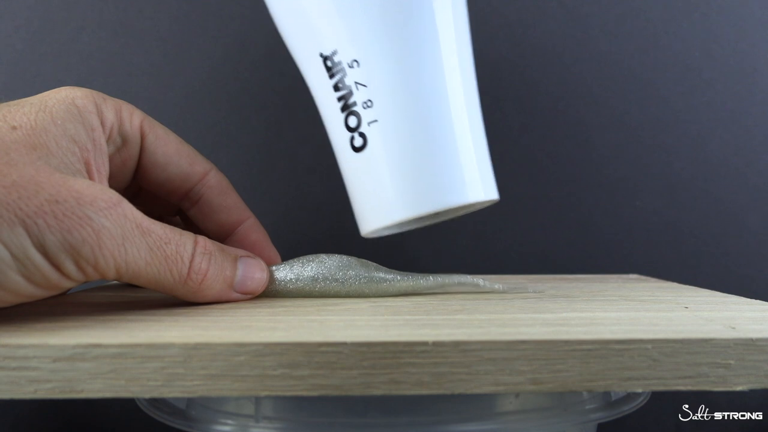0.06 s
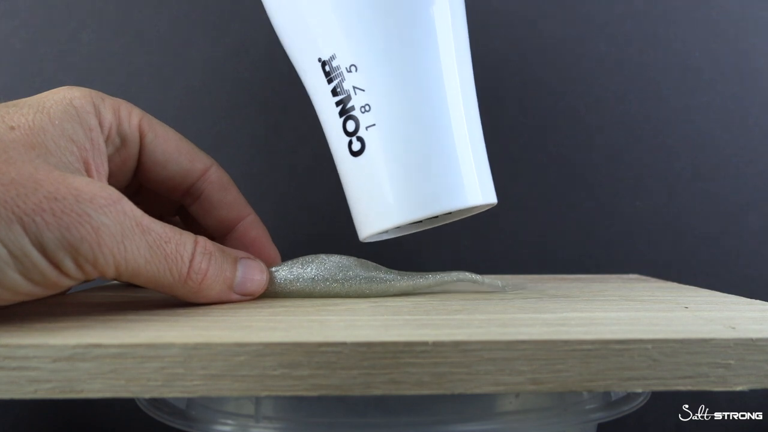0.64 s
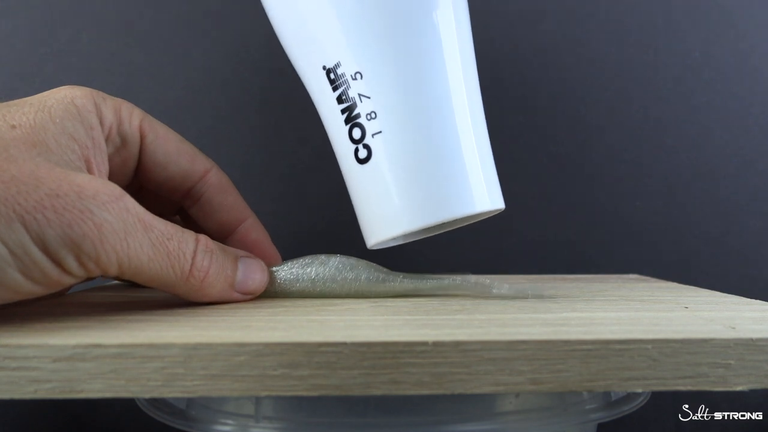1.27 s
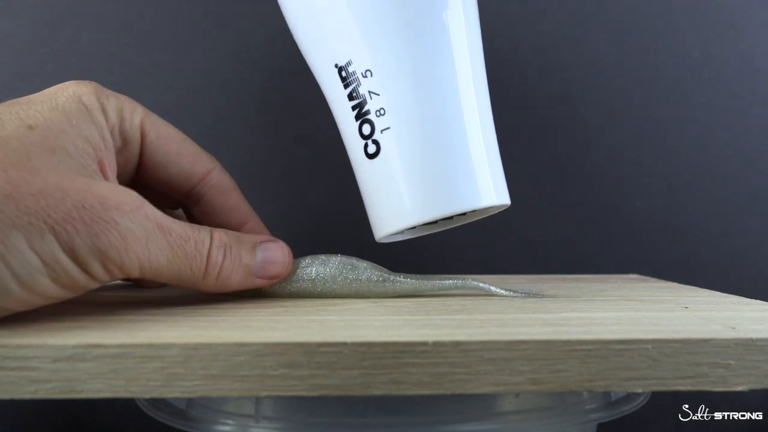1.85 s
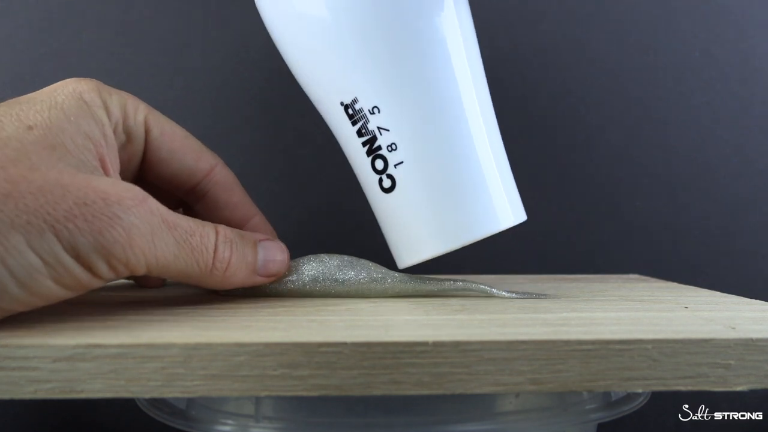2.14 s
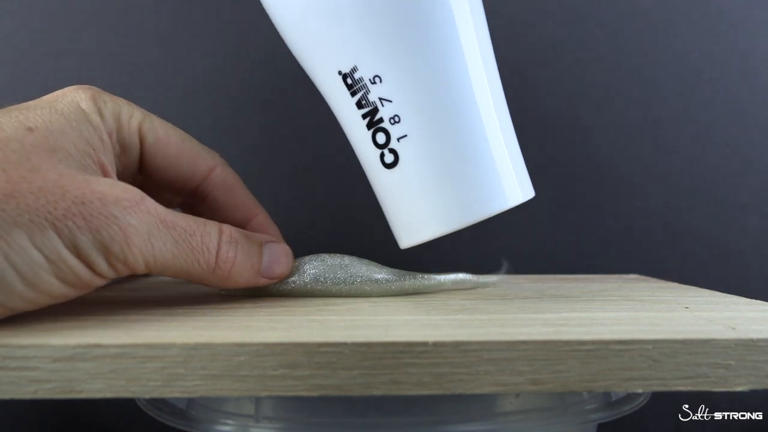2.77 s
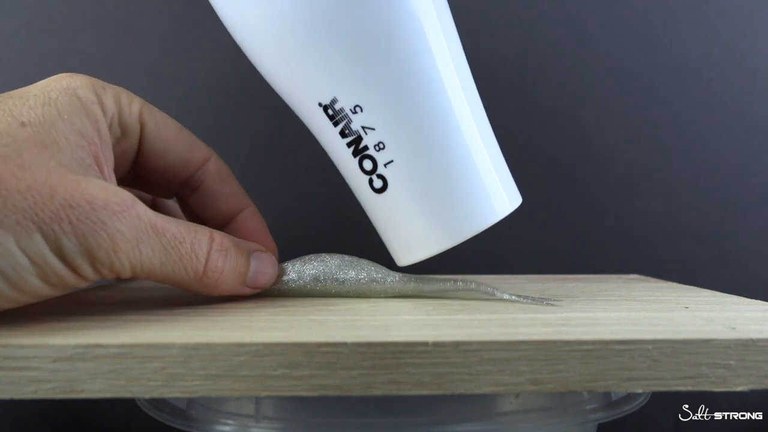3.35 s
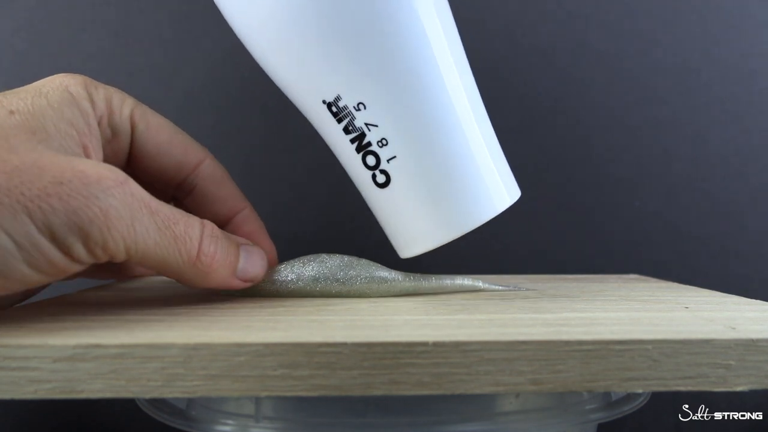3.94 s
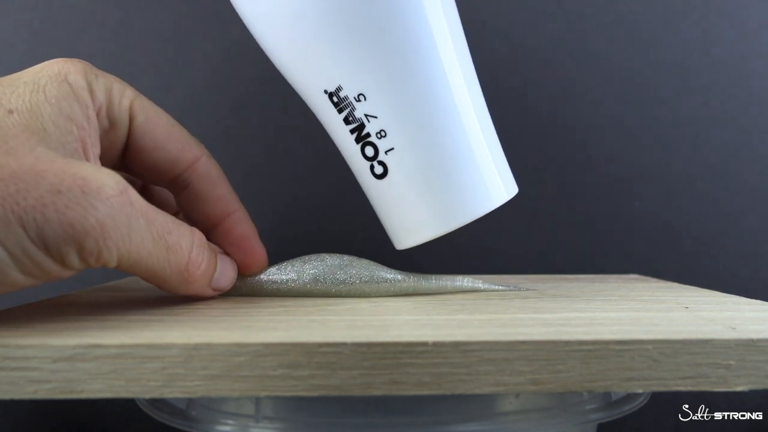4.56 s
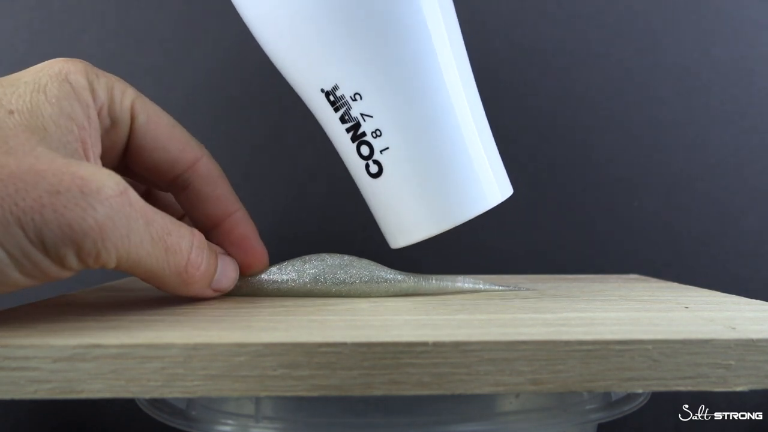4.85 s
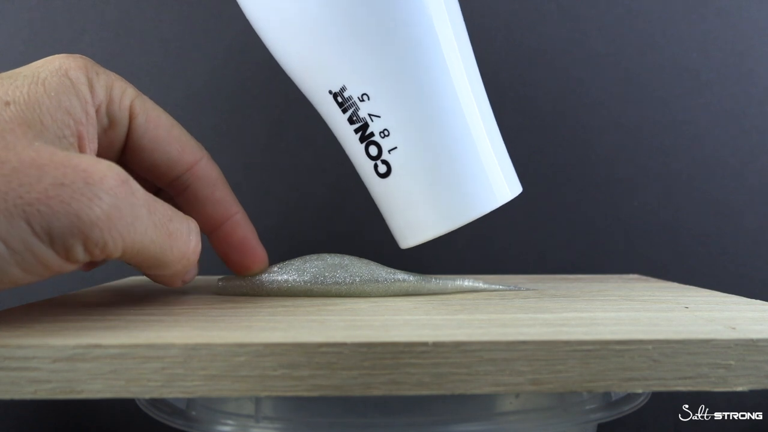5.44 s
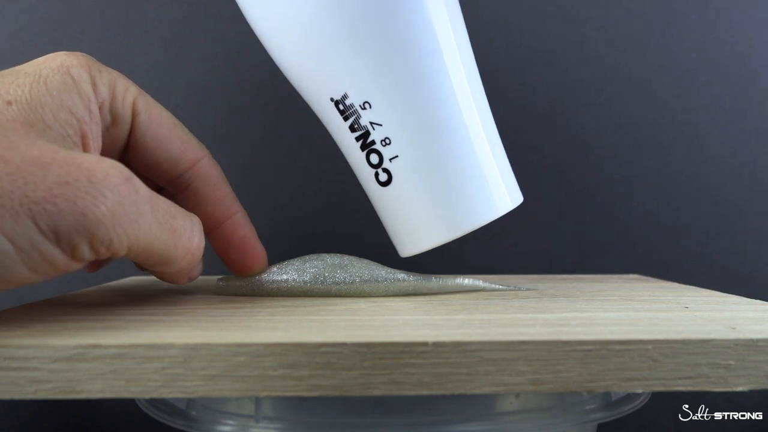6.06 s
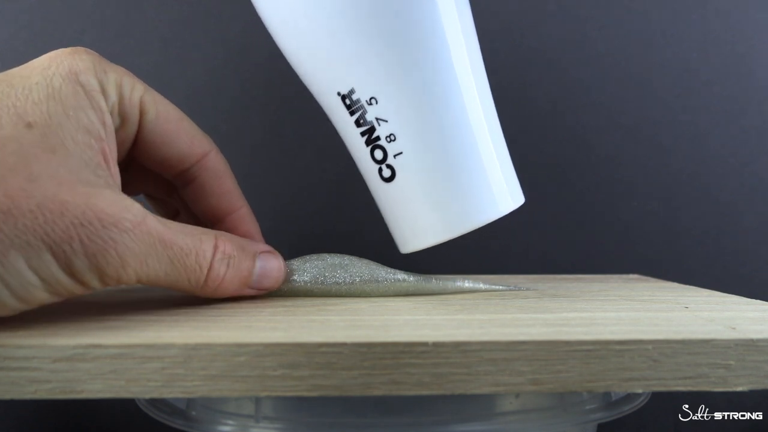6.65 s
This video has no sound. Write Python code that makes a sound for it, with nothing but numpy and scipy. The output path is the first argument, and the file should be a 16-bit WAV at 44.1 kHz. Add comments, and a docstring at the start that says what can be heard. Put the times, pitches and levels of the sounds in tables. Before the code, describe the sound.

Close, constant hair dryer air rush and faint fan whine, easing a little after two seconds, with slight rapid skipping from then on.

```python
"""Hair dryer on a wooden board

A handheld dryer blows steadily, close up and in mono. Air rushes through the resonant housing and
the fan whines faintly on multiples of its shaft speed. After two seconds the nozzle tilts down to
the board: the rush softens and the fan slows a little. From two seconds on, the sound also skips
about six times a second, like choppy audio, with faint low bumps and now and then a tiny tick."""
import sys
import numpy as np
from scipy import signal
from scipy.fft import rfft, irfft, next_fast_len
from scipy.io import wavfile
from scipy.ndimage import uniform_filter1d, map_coordinates

SR = 44100
rng = np.random.default_rng(int(sys.argv[2]) if len(sys.argv) > 2 else 0)


def unload_audio(sound):
    """Save the sound as a 16-bit wav file, at the path given as the first command line argument."""
    columns = np.transpose(np.atleast_2d(sound))
    # keep every value between -1 and 1, then stretch to whole-number steps
    steps = np.round(np.clip(columns, -1, 1) * 32767)
    wavfile.write(sys.argv[1], SR, steps.astype(np.int16))


N = 295911

# fan speed, easing off as the nozzle tilts: (time [s], speed [turns/s])
SHAFT_SPEED = [(0.0, 293.1), (1.9, 293.1), (2.15, 292.3), (2.85, 291.0), (3.75, 291.1), (4.5, 289.9),
               (4.9, 290.8), (6.1, 289.7), (6.71, 290.3)]
SKIP_FROM_S = 2.04


def rush(tilt, trim_db, flutter_db):
    """Turbulent air through the fan and housing; its colour follows the tilt of the nozzle."""
    # strength of the air stream: (time [s], level before trim [dB])
    flow = [(0.05, -37.5), (1.86, -37.5), (2.04, -39.5), (4.2, -40), (6.71, -39.5)]
    eddies = blade_chop(turbulence(patchy_db=0.68), first_turn=0.049, later_turns=0.048)
    eddies = room(eddies, wet_db=-18, t60=.15)
    upright = unit(filtered(eddies, lambda hz: air_colour(hz, 0)))
    tilted = unit(filtered(eddies, lambda hz: air_colour(hz, 1)))
    level_db = curves(flow)[0] + trim_db + flutter_db * wobble(13)
    return amp(level_db) * ((1 - tilt) * upright + tilt * tilted)


def turbulence(patchy_db):
    """Eddies: white noise whose bands swell and sink in small random patches."""
    spectrum = signal.stft(rng.standard_normal(N), nperseg=512)[2]
    patches = uniform_filter1d(rng.standard_normal(spectrum.shape), size=8, axis=0)  # across pitch
    patches = uniform_filter1d(patches, size=20, axis=1)  # across time
    return signal.istft(spectrum * amp(patchy_db * unit(patches)), nperseg=512)[1][:N]


def blade_chop(eddies, first_turn, later_turns):
    """The blades cut each eddy again on the next turns, so a little noise repeats at the shaft period."""
    speed, = curves(SHAFT_SPEED)
    one, two, three = (map_coordinates(eddies, [np.arange(N) - turns * SR / speed])
                       for turns in (1, 2, 3))
    return eddies + first_turn * one + later_turns * (two + three)


def air_colour(hz, pose):
    """Gain of the jet's spectrum lifted by the housing's resonances; pose 0 is upright, 1 tilted."""
    # spectrum of the jet: (frequency [Hz], upright level [relative dB], tilted level [relative dB])
    jet = [(50, -44, -45), (100, -31.5, -31), (183, -18, -19.5), (262, -10, -10.5), (484, -5, -6.5),
           (1070, -6, -5), (1320, 1, -1.5), (2450, -5.5, -6), (3440, -8, -10), (5810, -6.5, -8),
           (8230, -11, -15), (9140, -16.5, -20.5), (12400, -26, -27.5), (15400, -46, -45)]
    # housing and nozzle resonances: (centre [Hz], width [Hz], upright lift [dB], tilted lift [dB])
    resonances = [(344, 50, 1, 1.5), (410, 25, 2, 3), (614, 49, 5, 4), (693, 65, 6, 3.5), (776, 35, 2.5, 3),
                  (858, 116, 11.5, 8), (994, 71, 3.5, 3.5), (1460, 56, 0, 1.5), (1562, 110, 3, 2.5),
                  (1728, 184, 3.5, 4.5), (2014, 314, 9, 6.5), (2702, 206, 6.5, 4), (2903, 133, 7.5, 5.5),
                  (3240, 386, 9.5, 6), (3833, 87, 4.5, 7), (4980, 180, 4, 2.5), (6390, 450, 4, 2.5),
                  (7560, 98, 1.5, 6.5), (7870, 300, 1.5, 5), (9750, 460, 4, 4), (10750, 600, -3, 0)]
    points_hz, *jet_db = np.transpose(jet)
    db = np.interp(np.log(hz + 1), np.log(points_hz), jet_db[pose])
    for centre_hz, width_hz, *lift_db in resonances:
        db += lift_db[pose] * np.exp(-2 * ((hz - centre_hz) / width_hz) ** 2)
    return amp(db)


def fan(tilt, skips, sag_db=(2, 10.4), sag_s=.02, wander_hz=.12):
    """Tones on multiples of one shaft's speed; the main whine sags at every skip after the first."""
    # the three strong tones, whose levels shift as the hand moves, each: (time [s], level [dB])
    whine = [(0, -46.5), (1.55, -48), (1.85, -44), (1.9, -44), (1.927, -51), (1.96, -46), (2.04, -46.5),
             (2.14, -49.5), (2.42, -49), (2.55, -53), (2.76, -50), (3.02, -60), (3.25, -52), (3.55, -60),
             (3.8, -52.5), (3.98, -55), (4.4, -52.5), (4.75, -49), (5.0, -51.5), (5.17, -50.5),
             (5.48, -50.5), (5.8, -51.5), (6.1, -48.5), (6.38, -56), (6.48, -51), (6.58, -55),
             (6.71, -48.5)]
    octave = [(0, -53), (1.05, -53), (1.75, -53.5), (2.0, -53), (2.07, -61), (2.3, -66), (2.62, -55),
              (2.85, -54), (3.1, -51.5), (3.68, -48.5), (3.79, -55), (3.89, -47.5), (4.05, -51.5),
              (4.32, -50), (4.4, -56), (4.46, -53), (4.62, -54), (4.71, -48), (4.89, -47.5), (5.0, -56),
              (5.15, -49.5), (5.36, -51), (5.5, -48), (5.6, -57), (5.95, -54), (6.1, -55.5), (6.38, -50),
              (6.56, -54), (6.71, -48)]
    high_whistle = [(0, -56), (1.55, -62), (2.05, -65), (2.45, -64), (2.7, -57), (2.94, -59), (3.03, -54),
                    (3.12, -61), (3.7, -59), (3.87, -64), (3.97, -53.5), (4.08, -62), (4.34, -51.5),
                    (4.62, -58), (4.71, -51.5), (4.83, -60), (4.92, -52.5), (5.04, -63), (5.45, -55.5),
                    (5.55, -58), (5.8, -52.5), (5.88, -60), (6.1, -56), (6.37, -60), (6.71, -57)]
    # weaker fan and motor tones: (order [x shaft speed], upright level [dB], tilted level [dB])
    weak_tones = [(1, -67, -79), (3, -58.5, -66.5), (5, -57, -58), (12, -70, -72), (16, -64, -67.5),
                  (25, -74, -83), (28, -77, -69), (35, -90, -75)]
    t = np.arange(N) / SR
    speed, = curves(SHAFT_SPEED)
    angle = 2 * np.pi * np.cumsum(speed + wander_hz * wobble(25)) / SR
    dips_db = sum(rng.uniform(*sag_db) * np.exp(-((t - s) / sag_s) ** 2) for s in skips[1:])
    motor_whistle_db = -74 - 11 * np.maximum(t - .65, 0)  # holds, then fades 11 dB a second
    tones = amp(curves(whine)[0] - dips_db) * fan_tone(angle, tilt, skips, order=4)
    tones += amp(curves(octave)[0]) * fan_tone(angle, tilt, skips, order=8)
    tones += amp(curves(high_whistle)[0]) * fan_tone(angle, tilt, skips, order=20)
    tones += amp(motor_whistle_db) * fan_tone(angle, tilt, skips, order=45)
    for order, upright_db, tilted_db in weak_tones:
        tones += amp(upright_db + tilt * (tilted_db - upright_db)) * fan_tone(angle, tilt, skips, order)
    return tones


def fan_tone(angle, tilt, skips, order, jump_rad=1.3, jump_share=.6):
    """One fluttering shaft order at rms about 1; its phase jumps at many of the skips."""
    roughness = np.interp(tilt, [0, 1], [.09, .16])
    flutter = 1 + roughness * (wobble(36) + 1j * wobble(36))
    steps = rng.standard_normal(len(skips) + 1) * (rng.random(len(skips) + 1) < jump_share)
    jumps = jump_rad * np.cumsum(steps)[np.searchsorted(skips, np.arange(N) / SR)]
    carrier = np.exp(1j * (order * angle + jumps + 2 * np.pi * rng.random()))
    return np.sqrt(2) * np.real(flutter * carrier) / np.sqrt(1 + 2 * roughness ** 2)


def skip_times(period_s, scatter_s):
    """The nearly even beat on which the sound skips, like choppy audio."""
    beats = np.arange(SKIP_FROM_S, N / SR, period_s)
    return beats + scatter_s * rng.standard_normal(len(beats))


def noise_swells(ramp_s):
    """Bands of hiss and hollow blowing that rise and fade, plus breathy whistles on two high fan tones."""
    # swelling noise bands: (start [s], end [s], centre [Hz], width [Hz], level [dB])
    bands = [(-0.2, 1.1, 11700, 700, -72), (1.42, 2.08, 10000, 450, -68), (1.4, 2.12, 10266, 30, -70.5),
             (2.0, 3.1, 6250, 380, -59), (2.3, 3.95, 3080, 324, -56), (2.662, 2.98, 853, 60, -50.5),
             (3.05, 4.05, 7500, 200, -65), (3.2, 3.952, 857, 82, -52.5), (3.85, 5.95, 5805, 60, -63),
             (4.097, 4.92, 870, 98, -52.5), (5.12, 5.723, 1740, 120, -51)]
    t = np.arange(N) / SR
    out = np.zeros(N)
    for start, end, centre_hz, width_hz, db in bands:
        band = filtered(rng.standard_normal(N), lambda hz: np.exp(-((hz - centre_hz) / width_hz) ** 2))
        envelope = np.clip(np.minimum(t - start, end - t) / ramp_s, 0, 1)
        out += amp(db) * envelope * unit(band)
    return out


def bumps(decay_s, faint_count, faint_db, scatter_db):
    """Low bumps, short pushes of either sign: stronger ones around the skips, faint ones at random."""
    # the stronger bumps: (time [s], peak [dB])
    strong = [(2.044, -50), (2.2, -53), (2.493, -59), (2.661, -59), (2.803, -59), (2.96, -59), (3.116, -59),
              (3.261, -55), (3.416, -51), (3.924, -57), (4.18, -59), (4.478, -49), (4.939, -57),
              (5.108, -60), (5.397, -54), (5.55, -47), (5.709, -57), (5.757, -59), (6.01, -57),
              (6.577, -59), (6.623, -52)]
    faint_times = rng.uniform(SKIP_FROM_S, N / SR, faint_count)
    faint_peaks = rng.normal(faint_db, scatter_db, faint_count)
    t = np.arange(N) / SR
    out = np.zeros(N)
    for s, db in [*strong, *zip(faint_times, faint_peaks)]:
        near = np.abs(t - s) < .02
        push = np.exp(-np.abs(t[near] - s) / (decay_s * rng.lognormal(0, .15)))
        out[near] += rng.choice([-1, 1]) * amp(db) * push
    return out


def ticks():
    """A few skips leave a tiny sharp tick, heard only above the hiss."""
    # one-sample clicks: (time [s], level [dB])
    clicks = [(2.0328, -40), (2.4902, -39), (2.8025, -38), (2.9497, -39), (3.26, -40), (3.5623, -41),
              (4.9362, -43), (5.0913, -36), (6.0087, -40), (6.4662, -41)]
    out = np.zeros(N)
    for s, db in clicks:
        out[round(s * SR)] = amp(db)
    return out


def room(x, wet_db, t60):
    """Nearby walls answer after 4 ms and ripple the spectrum."""
    t = np.arange(SR // 4) / SR
    tail = rng.standard_normal(len(t)) * amp(-60 * t / t60) * (t > .004)
    return x + amp(wet_db) * signal.fftconvolve(x, tail / np.linalg.norm(tail))[:N]


def amp(db):
    """Decibels to gain."""
    return 10 ** (np.asarray(db) / 20)


def unit(x):
    """Scale to rms 1."""
    return x / np.sqrt(np.mean(x ** 2) + 1e-20)


def curves(rows):
    """Breakpoints to automation: one value per sample for each column after the time."""
    times, *columns = np.transpose(rows)
    return [np.interp(np.arange(N) / SR, times, column) for column in columns]


def wobble(rate):
    """A smooth random curve, rate knots a second."""
    knots = rng.standard_normal(int(N * rate / SR) + 4)
    smooth = signal.resample(knots, 8 * len(knots))
    return np.interp(np.arange(N) * rate / SR, np.arange(len(smooth)) / 8, smooth)


def filtered(x, response):
    """Equalise x by a gain given as a function of frequency."""
    size = next_fast_len(N + SR // 2)
    return irfft(rfft(x, size) * response(np.fft.rfftfreq(size, 1 / SR)), size)[..., :N]


def scene():
    """The dryer tilting down to the board, alike in both channels."""
    # lean of the nozzle: (time [s], tilt [0 upright, 1 onto the board])
    nozzle_tilt = [(0, 0), (1.88, 0), (2.1, 0.55), (2.9, 1), (6.71, 1)]
    tilt, = curves(nozzle_tilt)
    skips = skip_times(period_s=.1526, scatter_s=.003)
    mono = rush(tilt, trim_db=-0.65, flutter_db=0.16) + noise_swells(ramp_s=0.1) + fan(tilt, skips)
    mono += bumps(decay_s=0.00077, faint_count=36, faint_db=-66, scatter_db=1.5)
    mono += ticks()
    return np.array([mono, mono])


def record(dry):
    """A brick-wall low-pass takes off the very top of the hiss."""
    return filtered(dry, lambda hz: hz < 15720)


dry = scene()
out = record(dry)
unload_audio(out)
```